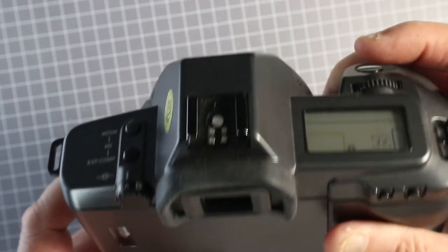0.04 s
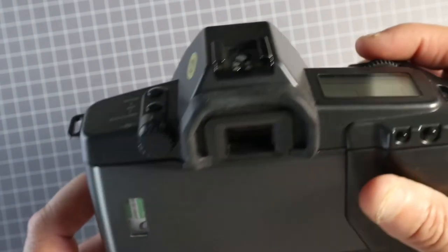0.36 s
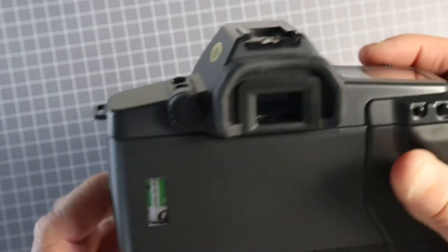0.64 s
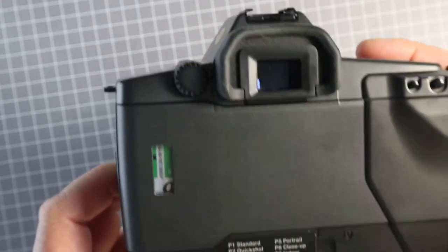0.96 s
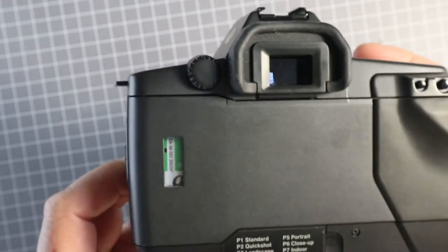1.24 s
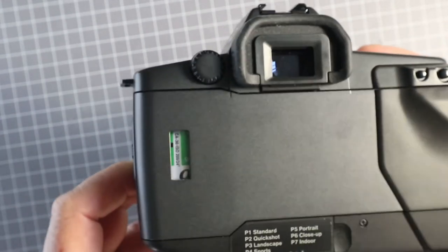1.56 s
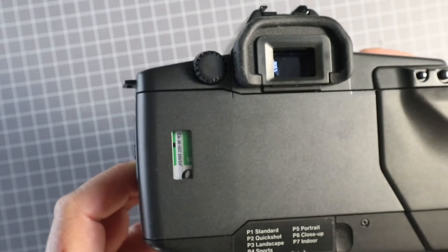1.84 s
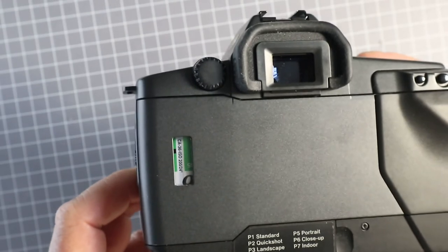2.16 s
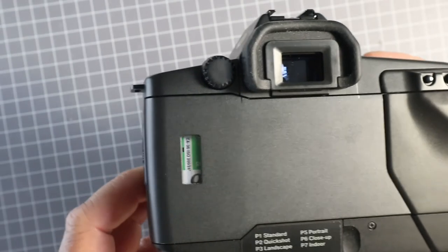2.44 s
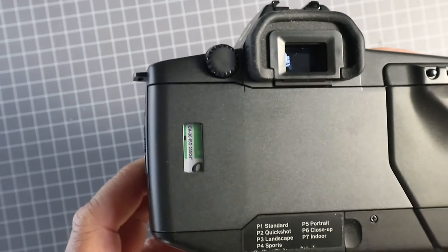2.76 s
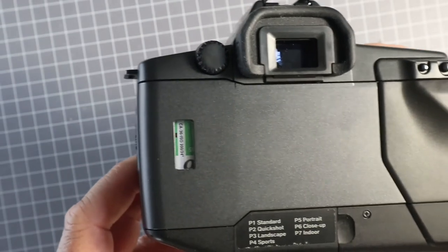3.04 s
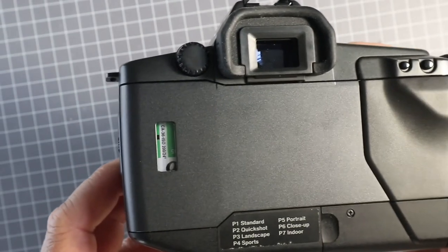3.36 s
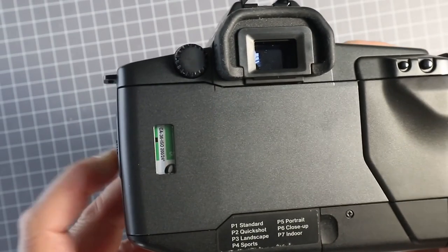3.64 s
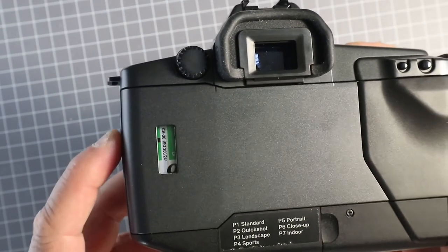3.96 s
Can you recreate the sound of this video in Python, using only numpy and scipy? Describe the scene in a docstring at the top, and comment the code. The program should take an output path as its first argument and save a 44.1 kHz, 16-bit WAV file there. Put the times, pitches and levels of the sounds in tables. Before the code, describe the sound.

A film camera's motor winds film close by for the whole four seconds, a steady high whine with buzzing gears and a fine plastic rattle. From about 0.3 to 1.5 seconds the tone shifts as the camera is turned round. Soft, rapid knocks of the film come up in the first second and gradually quicken, while the motor slows very slightly. The quiet room hums faintly behind.

```python
"""In a quiet room, a film camera winds its film by motor, close by, and is turned round early on.
The motor's small gear (the pinion) whines as its teeth meet, over a rougher second gear; both slow
a little as the spool fills. The teeth rattle in the plastic shell, and the film knocks softly over
a toothed wheel (the sprocket), faster and faster. The room rumbles and hums faintly behind it."""
import sys
import numpy as np
from scipy import signal
from scipy.fft import rfft, irfft, next_fast_len
from scipy.io import wavfile
from scipy.ndimage import map_coordinates

SR = 44100
rng = np.random.default_rng(int(sys.argv[2]) if len(sys.argv) > 2 else 0)


def generate_wav(signal):
    """Clip the signal to [-1, 1] and save it as 16-bit WAV at the path in sys.argv[1]."""
    frames = np.transpose(np.atleast_2d(signal))
    scaled = np.clip(frames, -1, 1) * 32767
    pcm = np.round(scaled).astype(np.int16)
    wavfile.write(sys.argv[1], SR, pcm)


N = 176400

# how fast the motor spins (time [s], speed [turns/s])
MOTOR_SPEED = [(0, 74.33), (0.4, 74.29), (0.8, 74.21), (1.3, 74.06), (1.9, 73.97), (2.4, 73.84),
               (2.7, 73.7), (3.2, 73.63), (3.6, 73.42), (4, 73.35)]
# the pinion's whine (time [s], main tone [dB], tone twice as high [dB], three times as high [dB])
WHINE_LEVELS = [(0, -35, -33, -30.5), (.23, -43, -29.5, -35), (.5, -38, -40, -45), (.72, -30, -38, -36),
                (.83, -30, -34, -32), (.91, -27, -41, -39), (1.02, -25, -31, -32.5), (1.14, -25, -33, -33),
                (1.22, -29, -32, -32.5), (1.4, -26, -30.5, -32.5), (2, -25.5, -30, -32.5),
                (2.35, -27, -26.5, -31.8), (3.2, -26.3, -27.3, -31.8), (4, -27.5, -27.3, -33.5)]
# strong tones from uneven teeth (pitch [times the motor speed], level [dB])
STRONG_BUZZ = [(24, -43.5), (25, -41.5), (27, -43.5), (28, -41), (30, -46), (32, -41.5), (33, -46),
               (35, -52), (36, -56), (42, -46.5), (52, -47.5), (54, -47.5), (56, -52), (57, -60),
               (59, -44.5), (61, -47), (62, -49), (63, -48), (66, -61), (84, -51), (86, -54), (90, -68),
               (97, -65), (111, -61), (112, -53), (116, -64), (119, -54), (120, -55), (122, -72),
               (145, -58.5), (174, -66), (191, -60), (203, -55)]
# the weak tones between them (frequency [Hz], level of each [dB])
WEAK_BUZZ = [(1400, -69), (2000, -53), (3000, -60), (4500, -67), (5400, -61), (6300, -54.5), (7700, -54),
             (8800, -65), (10000, -62.5), (15500, -68.5)]
# rise and fall of the whole buzz (time [s], gain [dB])
BUZZ_GAIN = [(0, 1), (.6, 1), (1.2, 0.5), (2, -2.5), (3, 0), (4, 0)]
# how fast the second gear spins (time [s], speed [turns/s])
GEAR_SPEED = [(0, 82.08), (0.6, 82.02), (1.3, 81.3), (2, 81.12), (2.4, 80.68), (2.7, 80.23), (3.2, 80.02),
              (3.6, 79.19), (4, 79.04)]
# its tones (pitch [times the gear speed], level [dB])
GEAR_TONES = [(19, -52.5), (23, -60.5), (27, -52), (29, -46.5), (32, -50.5), (40, -43.5), (43, -47.5),
              (44, -43), (45, -47.5), (46, -41), (48, -85), (49, -53.5), (51, -43), (53, -50.5),
              (72, -55.5), (95, -58)]
# rise and fall of those tones (time [s], gain [dB])
GEAR_GAIN = [(0, 0.5), (.6, 3), (1.3, 2), (2, 2.5), (2.6, -1), (4, -5.5)]
# a low drone driven by the second gear (pitch [times the drone's lowest], level [dB])
DRONE_TONES = [(1, -50.5), (2, -46.5), (3, -56.5), (4, -40), (5, -48)]
# tooth rattle through the shell (frequency [Hz], top facing us [dB per Hz], back facing us [dB per Hz])
SHELL_NOISE = [(201, -81, -83), (343, -74.5, -78), (418, -75.5, -72.5), (503, -61.5, -68),
               (574, -76, -80.5), (649, -66, -68.5), (690, -75, -78.5), (884, -72, -68.5),
               (1055, -71.5, -76), (1360, -71.5, -67.5), (1544, -66, -68), (1920, -60.5, -61.5),
               (1990, -55.5, -62.5), (2320, -62.5, -65), (2600, -61.5, -66.5), (2950, -70.5, -70),
               (3450, -63.5, -67), (4000, -66.5, -62), (4250, -72, -67.5), (4680, -65.5, -64),
               (4940, -67, -69), (6050, -67, -66.5), (6450, -66.5, -66), (6930, -85, -87.5),
               (7270, -70, -66.5), (7760, -68, -68), (7950, -75.5, -78.5), (9100, -72, -76.5),
               (10000, -76.5, -78.5), (10900, -77.5, -74), (12000, -72.5, -81.5), (13300, -77, -77),
               (14000, -73, -77), (14500, -75, -77), (15000, -71, -75), (15800, -76, -76)]
# the rattle's throb (rate [times the motor speed], depth [fraction])
THROB = [(1, 0.12), (2, 0.017), (3, 0.052), (4, .11), (5, 0.045)]
# rise and fall of the rattle below FIZZ_HZ (time [s], gain [dB])
RATTLE_GAIN = [(0, -1.5), (.6, 0), (1, 1), (1.6, 1), (2.5, 1.3), (3.2, 1), (4, .8)]
# rise and fall of the fizz above it (time [s], gain [dB])
FIZZ_GAIN = [(0, -3.5), (.2, -1.2), (.45, 0), (.8, .5), (1.3, -0.3), (2, 0.5), (2.7, -2), (3.3, -0.5),
             (4, -.3)]
# ringing of small gear parts (frequency [Hz], width [Hz], level [dB per Hz])
RINGS = [(2580, 42, -62), (3746, 39, -60.5), (5680, 48, -69), (6110, 50, -61.5), (7800, 130, -68.5),
         (8300, 36, -76), (8950, 37, -72.5), (9070, 66, -70.5), (9760, 50, -72), (10430, 50, -73),
         (10740, 53, -71.5), (11150, 62, -75), (12550, 60, -74), (13000, 40, -73), (13170, 40, -74),
         (14080, 160, -75), (14630, 50, -72), (15000, 150, -71)]
# how strong the knocks are (time [s], level [dB])
KNOCK_LEVEL = [(0, -45), (.25, -33), (.55, -30.5), (.85, -27.5), (1, -30), (1.3, -25), (1.7, -27.5),
               (1.95, -26.5), (2.15, -29.5), (2.7, -30.5), (2.95, -27.5), (3.25, -25), (3.45, -25.5),
               (4, -25.5)]
# each sprocket tooth in turn (gain [dB])
TOOTH_GAIN = [0, -3, -14, -8, -14, -2.5]
# the film's scrape (frequency [Hz], level [dB per Hz])
SCRAPE_NOISE = [(300, -74.5), (640, -66), (760, -63.5), (900, -56.5), (1120, -63), (1400, -60.5),
                (2000, -58), (3000, -71), (8000, -76.5)]
# rise and fall of the scrape against the knocks (time [s], gain [dB])
SCRAPE_GAIN = [(0, 0), (1, -4.5), (1.7, -4.5), (2.6, -6.5), (3.2, -0.5), (3.5, -1), (3.9, 1)]
# detour of the sound that bounces off the table (time [s], extra path [m])
BOUNCE_PATH = [(0, 0.095), (.3, 0.091), (.6, 0.154), (1, 0.186), (1.5, 0.229), (4, 0.19)]
# the room's rumble (frequency [Hz], level [dB per Hz])
ROOM_NOISE = [(20, -96), (32, -94), (45, -79), (70, -78.5), (120, -80.5), (200, -79.5), (300, -86.5),
              (1000, -86), (16000, -105)]
# the room's hum (frequency [Hz], level [dB])
ROOM_HUM = [(99.5, -53.5), (84, -63)]

PINION_TEETH, DRONE_CYCLES_PER_TURN = 29, 6.346
TURN_START_S, TURN_END_S = 0.32, 1.5  # the camera is turned round
FIZZ_HZ, FIZZ_THROB = 7800, .8
SPROCKET_START, SPROCKET_SPEED, SPROCKET_SPEEDUP = .2327, 6.5259, .5509  # turns, turns/s, turns/s each s


def pinion_whine(shaft, rough=.15, rough_hz=35):
    """The pinion's teeth meet at a fast, even pace, making a tone and two overtones."""
    return sum(amp(curve(WHINE_LEVELS, column=k)) * (1 + rough * wander(rough_hz))
               * tone(k * PINION_TEETH * shaft) for k in (1, 2, 3))


def motor_buzz(shaft, scatter_db=3, size=8192):
    """Small flaws in the teeth repeat on every turn: many weak tones under some strong ones."""
    multiples = np.arange(19, 213)
    level_db = spectrum(WEAK_BUZZ, multiples * MOTOR_SPEED[0][1])
    level_db += scatter_db * rng.standard_normal(len(multiples))
    tones = np.zeros(size // 2 + 1, complex)
    tones[multiples] = amp(level_db) * np.exp(2j * np.pi * rng.random(len(multiples)))
    tones[[round(k) for k, _ in STRONG_BUZZ]] = 0  # leave gaps for the strong tones
    one_turn = irfft(tones) * size / np.sqrt(2)
    weak = np.interp(shaft / (2 * np.pi) % 1 * size, np.arange(size), one_turn)
    strong = shaft_tones(shaft, STRONG_BUZZ, rough=.25, rough_hz=5)
    return amp(curve(BUZZ_GAIN)) * (weak + strong)


def second_gear():
    """A looser gear, whose speed wobbles as the film pulls, adds rough tones and a low drone."""
    shaft = shaft_angle(GEAR_SPEED, drift=.0008, drift_hz=6, flutter=.0015, flutter_hz=70)
    whirr = amp(curve(GEAR_GAIN)) * shaft_tones(shaft, GEAR_TONES, rough=.25, rough_hz=24.5)
    drone = shaft_tones(DRONE_CYCLES_PER_TURN * shaft, DRONE_TONES, rough=.17, rough_hz=9.6)
    return whirr + drone


def shell_rattle(shaft, grain_db=.22, grain_hz=200):
    """Tooth noise throbs with the motor and changes colour as the camera turns; its fizz is steadier."""
    turned = np.clip((np.arange(N) / SR - TURN_START_S) / (TURN_END_S - TURN_START_S), 0, 1)
    top, back = hiss(SHELL_NOISE, column=1), hiss(SHELL_NOISE, column=2)
    noise = np.sqrt(1 - turned) * top + np.sqrt(turned) * back
    treble = irfft(rfft(noise) * (np.fft.rfftfreq(N, 1 / SR) > FIZZ_HZ), N)
    throb = sum(depth * tone(round(k) * shaft) for k, depth in THROB) / np.sqrt(2)
    rattle = (noise - treble) * (1 + throb) * amp(curve(RATTLE_GAIN) + grain_db * wander(grain_hz))
    fizz = treble * (1 + FIZZ_THROB * throb) * amp(curve(FIZZ_GAIN))
    return rattle + with_table_bounce(fizz)


def ringing_parts():
    """Tooth noise keeps small parts ringing, each around its own pitch."""
    hz = np.fft.rfftfreq(N, 1 / SR)
    power = sum(amp(db) ** 2 / (1 + (2 * (hz - centre) / width) ** 4) for centre, width, db in RINGS)
    return shaped_noise(np.sqrt(power))


def sprocket_knocks(knock_hz=423, knock_s=.0028, scrape_s=.004, scatter_db=1.0):
    """Each tooth gives a short, hollow knock and a scrape as the film passes."""
    t = np.arange(N) / SR
    turns = SPROCKET_START + SPROCKET_SPEED * t + SPROCKET_SPEEDUP * t ** 2 / 2
    tooth = np.floor(len(TOOTH_GAIN) * turns).astype(int)
    level_db, knocks, contact = curve(KNOCK_LEVEL), np.zeros(N), np.zeros(N)
    for hit in np.flatnonzero(np.diff(tooth)) + 1:
        near = slice(max(hit - 800, 0), hit + 800)
        offset_s = t[near] - t[hit]
        tooth_db = TOOTH_GAIN[tooth[hit] % len(TOOTH_GAIN)]
        force = amp(level_db[hit] + tooth_db + scatter_db * rng.standard_normal())
        hollow_tone = np.cos(2 * np.pi * (knock_hz * offset_s + rng.random()))
        knocks[near] += force * np.exp(-.5 * (offset_s / knock_s) ** 2) * hollow_tone
        contact[near] += force * np.exp(-.5 * (offset_s / scrape_s) ** 2)
    scrape = contact / amp(level_db.max()) * amp(curve(SCRAPE_GAIN)) * hiss(SCRAPE_NOISE)
    return knocks + scrape


def with_table_bounce(sound, bounce_db=-16, sound_m_per_s=343):
    """Adds a late copy off the table; its path grows as the camera turns, sweeping the colour."""
    late = np.arange(N) - curve(BOUNCE_PATH) / sound_m_per_s * SR
    return sound + amp(bounce_db) * map_coordinates(sound, [late], order=3)


def room():
    """A faint rumble and two low, steady hums."""
    t = np.arange(N) / SR
    return hiss(ROOM_NOISE) + sum(amp(db) * tone(2 * np.pi * hz * t) for hz, db in ROOM_HUM)


def shaft_angle(speeds, drift, drift_hz, flutter, flutter_hz):
    """How far a shaft has turned, in radians; its speed drifts slowly and flutters quickly."""
    speed = curve(speeds) * (1 + drift * wander(drift_hz) + flutter * wander(flutter_hz))
    return 2 * np.pi * np.cumsum(speed) / SR


def shaft_tones(shaft, rows, rough, rough_hz, swell=.35, swell_hz=1.3):
    """A shaft's tones, each wavering quickly and swelling slowly as the camera moves in the hands."""
    return sum(amp(db) * (1 + swell * wander(swell_hz) + rough * wander(rough_hz))
               * tone(round(k) * shaft) for k, db in rows)


def tone(phase):
    """A pure tone of power 1 that starts at a random point in its cycle."""
    turns = phase / (2 * np.pi) + rng.random()
    return np.sqrt(2) * np.cos((2 * np.pi * (turns % 1)).astype(np.float32))


def wander(rate_hz, step=64):
    """A smooth random wobble of about size 1, mostly slower than rate_hz."""
    count = next_fast_len(N // step + 2, True)
    hz = np.fft.rfftfreq(count, step / SR)
    points = irfft(rfft(rng.standard_normal(count)) / np.sqrt(1 + (hz / rate_hz) ** 4), count)
    return np.interp(np.arange(N) / step, np.arange(count), points / points.std())


def hiss(rows, column=1):
    """Noise whose colour follows a frequency table."""
    return shaped_noise(amp(spectrum(rows, np.fft.rfftfreq(N, 1 / SR), column)))


def shaped_noise(gain):
    """Noise with the given strength at each frequency."""
    return irfft(rfft(rng.standard_normal(N)) * gain, N) * np.sqrt(SR / 2)


def spectrum(rows, hz, column=1):
    """Reads a frequency table at hz, with the octaves evenly spaced."""
    rows = np.array(rows, float)
    return np.interp(np.log(hz + 1), np.log(rows[:, 0] + 1), rows[:, column])


def curve(rows, column=1):
    """Reads a time table at every sample."""
    rows = np.array(rows, float)
    return np.interp(np.arange(N) / SR, rows[:, 0], rows[:, column])


def amp(db):
    """Turns decibels into a number to multiply by."""
    return 10 ** (np.asarray(db) / 20)


def scene():
    """The camera and the room together, the same in both ears."""
    shaft = shaft_angle(MOTOR_SPEED, drift=.0004, drift_hz=8, flutter=.0006, flutter_hz=90)
    gears = pinion_whine(shaft) + motor_buzz(shaft) + second_gear()
    clatter = shell_rattle(shaft) + with_table_bounce(ringing_parts()) + sprocket_knocks()
    mix = gears + clatter + room()
    return np.array([mix, mix])


def record(dry):
    """Cuts away the highest treble, above 15800 Hz."""
    low_pass = signal.firwin(801, 15800, window=("kaiser", 9), fs=SR)
    return signal.oaconvolve(dry, low_pass[None], "same")


dry = scene()
out = record(dry)
generate_wav(out)
```